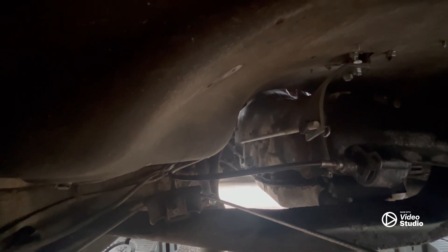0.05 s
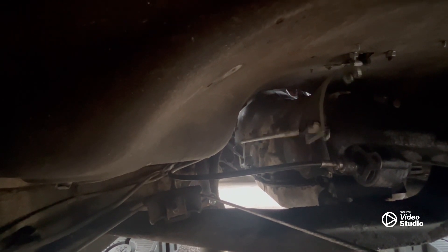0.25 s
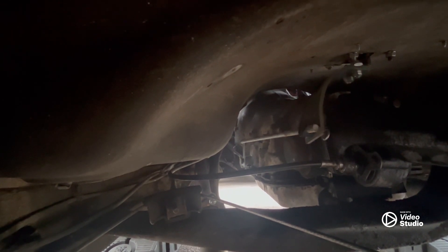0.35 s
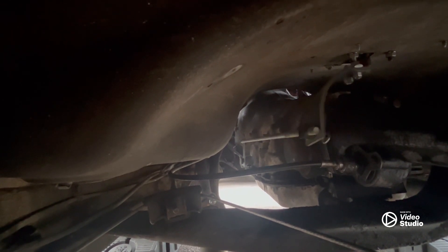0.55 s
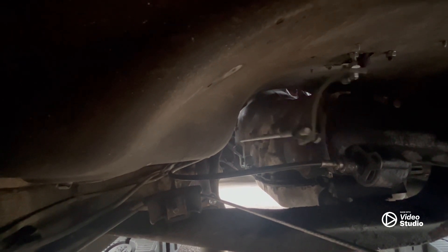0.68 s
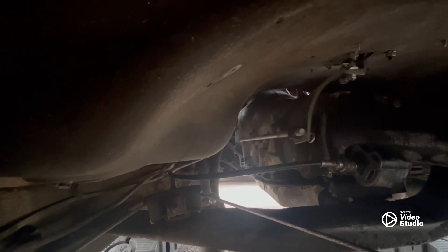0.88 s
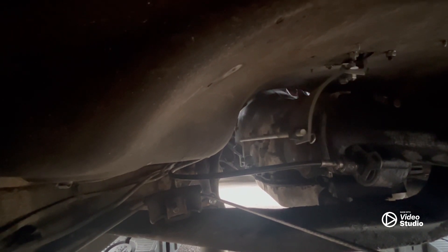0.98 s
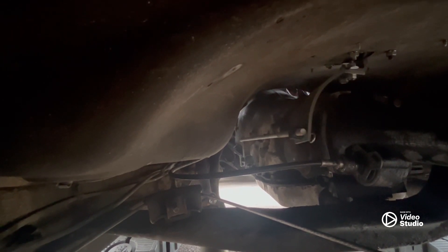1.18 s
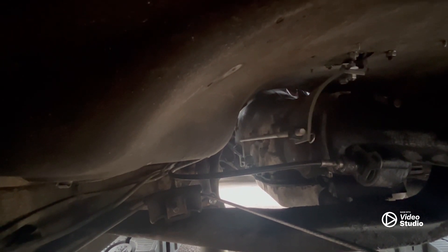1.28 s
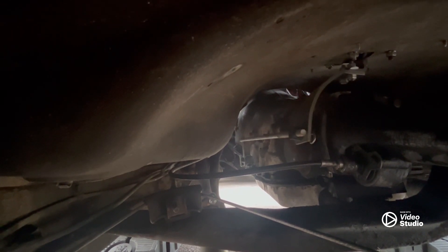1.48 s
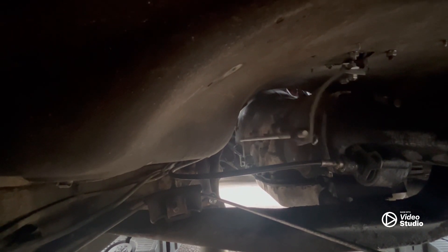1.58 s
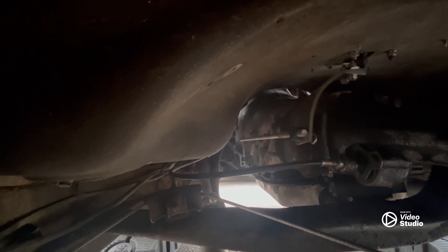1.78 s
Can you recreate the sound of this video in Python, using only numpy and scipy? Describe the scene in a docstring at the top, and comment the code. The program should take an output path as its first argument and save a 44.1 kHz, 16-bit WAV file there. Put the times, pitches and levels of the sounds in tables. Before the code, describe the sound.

Heavy metallic gear shift clunks beneath a vehicle, then a faint joint creak and a softer clack

```python
"""Under a car in a workshop, over quiet room air and a low rumble, a gear linkage is pushed through two detents.
Steel parts scrape, strike and ring as decaying modes; mounts and floor pan thump with a pitch that settles.
From 0.75 s the body and steelwork hum on, then a joint creaks in short stick-slip ticks.
Near 1.6 s the linkage is eased once more. Thin pings of steel are scattered over the whole scene.
Two microphones hear it in stereo."""
import sys
import numpy as np
from scipy import signal
from scipy.fft import rfft, irfft, next_fast_len
from scipy.io import wavfile

SR = 44100
rng = np.random.default_rng(int(sys.argv[2]) if len(sys.argv) > 2 else 0)


def pcm_store(signal):
    """Save signal as 16-bit PCM."""
    levels = np.round(np.clip(np.atleast_2d(signal), -1, 1) * 32767)
    wavfile.write(sys.argv[1], SR, levels.astype(np.int16).T)


N = 81585  # length in samples


def undb(db):
    """Amplitude ratio from a level: 20 dB for each factor of ten."""
    return 10 ** (np.asarray(db) / 20)


def along(hz, points, values):
    """Linear interpolation on a logarithmic frequency axis, with constant ends."""
    return np.interp(np.log(np.maximum(hz, 1)), np.log(points), values)


def shape(x, points, db):
    """Minimum-phase filtering: folding the cepstrum makes a magnitude response through f/Hz, level/dB causal."""
    size = next_fast_len(x.shape[-1] + 4096, True) // 2 * 2
    hz = np.arange(size // 2 + 1) * SR / size
    cepstrum = irfft(np.log(undb(along(hz, points, db))))
    cepstrum[1:size // 2] *= 2
    cepstrum[size // 2 + 1:] = 0
    response = np.exp(rfft(cepstrum))
    return irfft(rfft(x, size) * response)[..., :x.shape[-1]]


def add(out, x, at):
    """Superposition: sounds add linearly, here from the time at/s onward."""
    i = max(int(at * SR), 0)
    out[..., i:i + x.shape[-1]] += x[..., :max(N - i, 0)]


def pair(likeness, size):
    """Partial coherence: shared and opposed noise spectra set the left-right correlation."""
    c = np.clip(likeness, -.99, .99)
    mid, side = rfft(rng.standard_normal((2, size)))
    opposed = side * np.array([[1], [-1]])
    return mid * np.sqrt((1 + c) / 2) + opposed * np.sqrt((1 - c) / 2)


def fade(t, t60):
    """Exponential damping: the level falls by 60 dB in t60."""
    return np.exp(-np.log(1000) * t / t60)


def dense_ring(table, stretch, size):
    """High modal overlap: countless modes act as noise whose bands each decay at their own rate."""
    points, t60, db, likeness = np.array(table).T
    hz = np.arange(size // 2 + 1) * SR / size
    t = np.arange(size) / SR
    low_cut = hz ** 2 / (hz ** 2 + 70 ** 2)
    noise = pair(along(hz, points, likeness), size) * undb(along(hz, points, db)) * low_cut
    bands = np.eye(len(points))  # overlapping triangles, one for each table row
    return sum(irfft(noise * along(hz, points, band)) * fade(t, decay * stretch)
               for band, decay in zip(bands, t60))


def through(x, response):
    """Linear response: the output is the source convolved with the impulse response."""
    return signal.fftconvolve(np.atleast_2d(x), response, axes=-1)[:, :N]


def tone(hz, db, swell, t60, sag):
    """A driven mode: it swells, then decays freely; it starts sharp by the fraction sag and settles to hz."""
    sag_cycles = 1.3  # time constant of the settling, in periods
    t = np.arange(N // 2) / SR
    turns = hz * t + sag * sag_cycles * (1 - np.exp(-hz * t / sag_cycles))
    rise = np.sin(np.pi / 2 * np.minimum(t / swell, 1))
    decay = fade(np.maximum(t - swell, 0), t60)
    return undb(db) * rise * decay * np.sin(2 * np.pi * turns)


def resonant(centre_hz, width_hz, likeness):
    """A single resonance selects a band of stereo noise, scaled to rms 1."""
    hz = np.arange((N + 1) // 2 + 1) * SR / (N + 1)
    resonance = 1 / (1 + (2 * (hz - centre_hz) / width_hz) ** 2)
    x = irfft(pair(likeness, size=N + 1) * resonance)[:, :N]
    return x / x.std()


def workshop():
    """Stationary noise: room air, more coherent between the sides at low frequency, and a resonant low rumble."""
    # relative spectrum of the room air, before low cut and scaling: f/Hz, level per Hz/dB
    air_spectrum = [(59, -43), (100, 5.5), (159, -11), (236, -20.5), (472, -23), (646, -34), (1290, -34.5),
                    (1430, -41.5), (2600, -49), (4260, -45.5), (15000, -69)]
    air_db, rumble_db, rumble_hz = -49, -49, 68  # rms levels/dB, f/Hz
    hz = np.arange((N + 1) // 2 + 1) * SR / (N + 1)
    colour = undb(along(hz, *np.array(air_spectrum).T))
    low_cut = hz ** 2 / (hz ** 2 + 110 ** 2)
    likeness = 1 / (1 + (hz / 450) ** 2)
    air = irfft(pair(likeness, size=N + 1) * colour * low_cut)[:, :N]
    rumble = resonant(rumble_hz, 60, 0.87)
    return undb(air_db) * air / air.std() + undb(rumble_db) * rumble


def pings():
    """Lightly loaded modes: thin steel pings and squeaks swell and die at a steady pitch."""
    # pings: t/s, f/Hz, level/dB (peak), swell/s, t60/s
    ping_table = [(0.129, 1240, -42, 0.0016, 0.036), (0.141, 975, -51, 0.028, 0.12),
                  (.29, 2240, -51, 0.034, 0.31), (0.647, 13350, -42, .008, 0.42),
                  (.876, 4660, -56, 0.022, 0.11), (1.568, 1373, -38.5, 0.0022, 0.046)]
    out = np.zeros(N)
    for at, hz, db, swell, t60 in ping_table:
        add(out, tone(hz, db, swell, t60, 0), at)
    return out


def creak():
    """Stick-slip friction: each slip of the joint is a tiny crack that rings its modes and echoes under the floor."""
    # slips: t/s, relative level/dB
    slips = [(0.807, 0), (0.902, 2.5), (0.928, 0.5), (0.948, 0), (0.966, -1.5), (0.985, -1), (1.012, -2)]
    # joint modes: f/Hz (mean, scattered at each slip), level/dB (before slip level and pan), t60/s
    joint_modes = [(1201.5, -50.5, 0.17), (1265, -44.5, 0.072), (1820, -53.5, 0.031), (4700, -66, 0.31),
                   (7620, -62, 0.05)]
    slip_s, pitch_scatter = 0.0022, 0.015  # build-up time of a slip, relative spread of each mode
    crack_db, crack_t60_s = -49, .05  # crack level before its filter
    echo_db, echo_t60_s = -9, .25
    pan_db = 5  # left minus right
    out = np.zeros((2, N))
    t = np.arange(N // 8) / SR
    rise = np.minimum(t / slip_s, 1)
    for at, db in slips:
        ring = np.zeros(len(t))
        for hz, mode_db, t60 in joint_modes:
            pitch = hz * (1 + pitch_scatter * rng.standard_normal())
            ring += undb(mode_db) * fade(t, t60) * np.sin(2 * np.pi * pitch * t)
        crack = undb(crack_db) * fade(t, crack_t60_s) * rng.standard_normal((2, len(t)))
        crack = shape(crack, [5000, 13000], [0, -20])
        add(out, undb(db) * rise * (ring + crack), at)
    echo = rng.standard_normal((2, len(t))) * fade(t, echo_t60_s)
    out = out + undb(echo_db) * through(out, echo / np.linalg.norm(echo[0]))
    return out * undb(np.array([[pan_db], [-pan_db]]) / 2)


def body():
    """Low-frequency modes: knocks in the mounts boom under the floor pan; body and steelwork hum on."""
    # dull knocks in mounts and floor pan: t/s, settled f/Hz, level/dB (peak, without boom), swell/s, t60/s
    thumps = [(0.048, 89, -27.5, 0.0036, 0.089), (0.2381, 64, -11.5, 0.0083, 0.34),
              (0.2679, 56.5, -5.5, 0.0055, 0.1), (.289, 356, -22, 0.0096, 0.049),
              (0.4, 240, -25, 0.011, 0.033), (0.415, 63.3, -9.5, 0.012, 0.12),
              (0.471, 98.1, -19.5, 0.0027, 0.17), (0.477, 330, -30.5, 0.026, 0.052),
              (0.501, 178.2, -32.5, 0.0053, 0.1), (0.534, 53.2, -21, 0.028, 0.21),
              (0.624, 83.2, -11, 0.017, 0.26), (0.631, 134.2, -12, 0.01, 0.099),
              (0.688, 60.3, -9, 0.0027, 0.08), (1.131, 301, -45.5, 0.0078, 0.089),
              (1.591, 59.3, -28, 0.089, 0.15), (1.6274, 523.5, -32, 0.0025, 0.099),
              (1.6285, 313.3, -18.5, 0.0042, 0.067), (1.647, 65.6, -16, 0.0027, 0.055),
              (1.650, 329.7, -27.5, 0.0016, 0.1)]
    # hum of the body and steelwork once the gear is in: f/Hz, level/dB (peak), t60/s
    hum_modes = [(62.9, -28.5, 0.69), (73.8, -31.5, 4.26), (118.7, -35, 1.03), (375, -45, 0.77),
                 (812, -46, 1.17)]
    hum_from_s, sag = 0.75, 0.25  # a knock starts sharp by the fraction sag
    boom_db, boom_t60_s = -16, .5
    knocks, hum = np.zeros(N), np.zeros(N)
    t = np.arange(N) / SR
    for at, hz, db, swell, t60 in thumps:
        add(knocks, tone(hz, db, swell, t60, sag), at)
    humming = sum(undb(db) * fade(t, t60) * np.sin(2 * np.pi * hz * t) for hz, db, t60 in hum_modes)
    add(hum, humming, hum_from_s)
    boom = irfft(pair(0.78, size=32768))
    boom = boom * fade(t[:boom.shape[1]], boom_t60_s)
    return knocks + hum + undb(boom_db) * through(knocks, boom / np.linalg.norm(boom[0]))


def linkage():
    """Impact excitation: a swelling scrape and a blow drive dense casing modes, clear steel modes and the room."""
    # steel contacts: t/s, scrape build-up/s, level/dB of the force at each of the six strike_hz, ring length factor
    strikes = [(0.044, 0.00041, -14.5, -24.5, -34, -47, -75.5, -88, 0.91),
               (0.057, 0.00097, -37, -40, -46, -40.5, -65.5, -93.5, 0.34),
               (.130, 0.001, -46, -48, -43, -42, -80.5, -85.5, 2),
               (.161, 0.0035, -49, -53.5, -39, -42, -67.5, -92, 2.3),
               (.232, 0.0038, -11.5, -15.5, -27, -44.5, -26.5, -46.5, 1.53),
               (0.2447, 0.0014, -6, -9.5, -10, -25, -20.5, -21.5, 0.8),
               (.256, 0.0016, -4.5, -11.5, -24, -21.5, -28.5, -40.5, 1.21),
               (.296, 0.0036, -22, -30.5, -34, -30, -49, -78.5, 0.56),
               (0.4, 0.011, -7.5, -33.5, -34, -39, -56, -66, 1.72),
               (0.478, 0.028, -20.5, -26.5, -48.5, -46, -66, -90.5, 2.5),
               (.511, 0.0014, -42.5, -50.5, -52.5, -42.5, -49, -58, 1),
               (0.6144, 0.0026, -1, -12, -15.5, -16.5, -22.5, -28, 1.18),
               (.625, 0.00089, 0, 1.5, -2.5, -15.5, -19, -39.5, .8),
               (.631, 0.00052, 3, 1, -2.5, -6, -28.5, -9.5, 0.23),
               (.661, 0.0017, -6, -5.5, -15, -17.5, -42, -46.5, 0.57),
               (0.768, .003, -22, -41, -53, -49.5, -43.5, -69, 1.16),
               (1.5605, 0.00085, -25, -25.5, -39, -35, -39.5, -57, 0.66),
               (1.570, .0012, -25, -28.5, -42, -31, -44.5, -62, 0.93),
               (1.8, 0.0022, -22, -25.5, -41.5, -44, -56, -67.5, 0.25),
               (1.812, 0.0045, -31.5, -40, -49, -49, -58.5, -67.5, 0.58)]
    # points of the force spectrum: f/Hz
    strike_hz = [300, 600, 950, 1400, 5000, 12000]
    # dense casing modes: f/Hz, t60/s (before the ring length factor), relative level/dB, left-right likeness
    casing = [(100, .2, -12, .95), (200, .17, -11, .85), (350, .17, -1, .7), (630, .16, -5, -.3),
              (900, .17, 1, -.2), (1400, .18, -2, -.1), (2600, .15, -3, .05), (5000, .12, 0, .05),
              (7500, .11, -1, -.1), (10000, .1, 1, -.1), (15000, .08, -10, .6)]
    # clear modes of linkage and casing: f/Hz, level/dB (relative to steel_db), t60/s, left-right phase/rad
    steel_modes = [(311.3, -16, .13, 0.36), (360.4, -15, 0.27, 0.35), (423, -17.5, .32, 0.5),
                   (486, -10, .2, .5), (555.6, -14.5, 0.34, 1.0), (676.4, -27.5, 0.57, .63),
                   (753, -7, 0.47, 2.23), (800.6, -5, 0.14, 2.1), (930, 2, .14, 2.3), (989, -3.5, .09, 3),
                   (1158, -7.5, 0.22, 2.2), (1588, -1.5, 0.13, 1.7), (2139, -3, 0.06, 2.5),
                   (2573, -5, 0.11, 1.4), (3820, -2.5, .11, 1.4), (4703, -9.5, .14, 3.0),
                   (5790, -3.5, .09, 1.4), (6580, 6, .07, 0.91)]
    # workshop echo: f/Hz, t60/s, level/dB, left-right likeness
    room = [(100, 1.0, -29.5, 0.94), (355, 1.6, -33.5, 0.27), (837, 1.4, -33.5, 0.0064),
            (2005, 0.29, -28, 0.12), (4984, 0.8, -41, 0), (12320, 0.16, -47, 0.52)]
    steel_db, scrape_db, grain_spread_db = -19, 3, 6  # scrape energy is relative to the blow
    out, force = np.zeros((2, N)), np.zeros(N)
    lead = 1024  # samples of scrape ahead of the blow
    lag = (np.arange(4 * lead) - lead) / SR
    for at, build, *colour, stretch in strikes:
        grains = rng.standard_normal(len(lag)) * undb(grain_spread_db * rng.standard_normal(len(lag)))
        push = grains * np.exp(-abs(lag) / build) * (lag < 0)
        push *= undb(scrape_db) / np.linalg.norm(push)
        push[lead] = 1  # the blow
        push = shape(push, strike_hz, colour)
        start = at - lead / SR
        add(out, through(push, dense_ring(casing, stretch, size=12288)), start)
        add(force, push, start)
    t = np.arange(N) / SR
    modes = np.zeros((2, N))
    for hz, db, t60, lean in steel_modes:
        phase = np.array([[lean], [-lean]]) / 2
        modes += undb(db + steel_db) * fade(t, t60) * np.sin(2 * np.pi * hz * t + phase)
    echo = dense_ring(room, 1, size=65536)
    return out + through(force, modes) + through(force, echo)


def scene():
    """Superposition of all sources at the two microphones."""
    return workshop() + pings() + creak() + body() + linkage()


def record(dry):
    """Transduction: the two ports colour the sides, bass and top are cut, and saturation rounds the peaks."""
    # left minus right at the microphones: f/Hz, level/dB
    balance = [(100, 1.47), (300, -2), (550, 3.5), (1100, 0), (2200, 1.5), (6000, 3), (8500, -5.5),
               (12500, -2.5)]
    low_hz, top_hz = 34, 15300  # filter edges; the bass cut runs forward and backward
    points, db = np.array(balance).T
    heard = np.array([shape(dry[0], points, db / 2), shape(dry[1], points, -db / 2)])
    heard = signal.sosfiltfilt(signal.butter(2, low_hz, "high", fs=SR, output="sos"), heard)
    heard = heard / (1 + (heard / .9) ** 8) ** (1 / 8)
    return signal.sosfilt(signal.ellip(10, .2, 90, top_hz, fs=SR, output="sos"), heard)


dry = scene()
out = record(dry)
pcm_store(out)
```